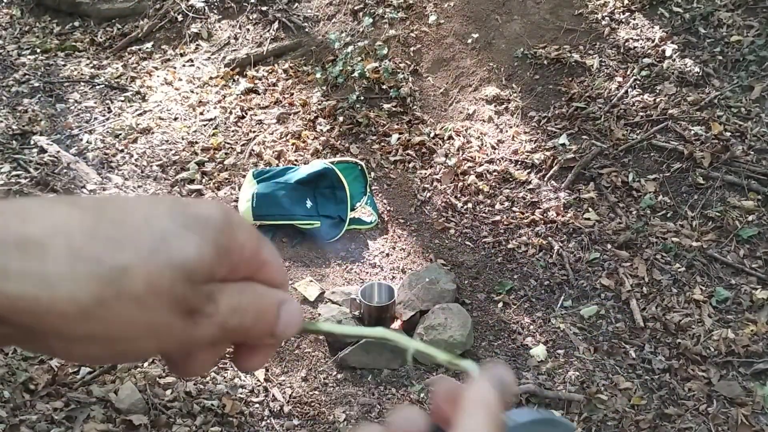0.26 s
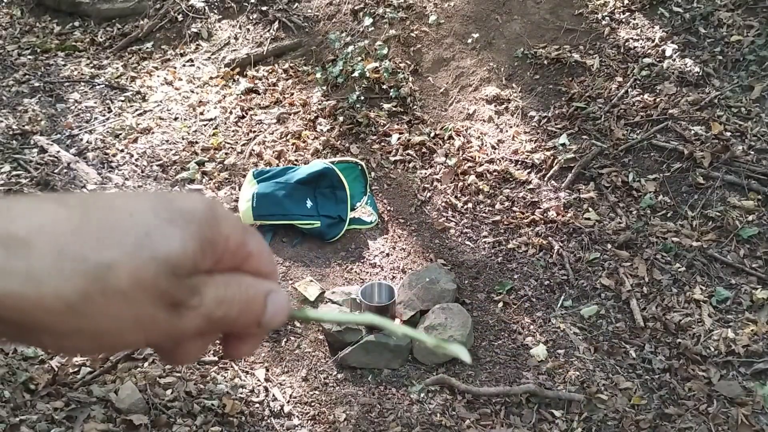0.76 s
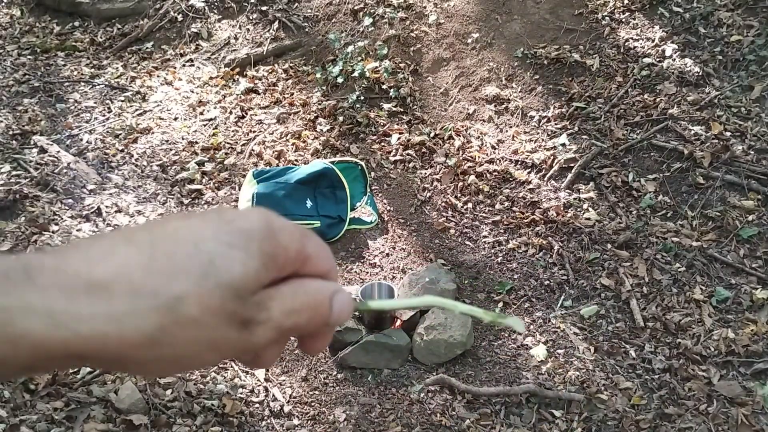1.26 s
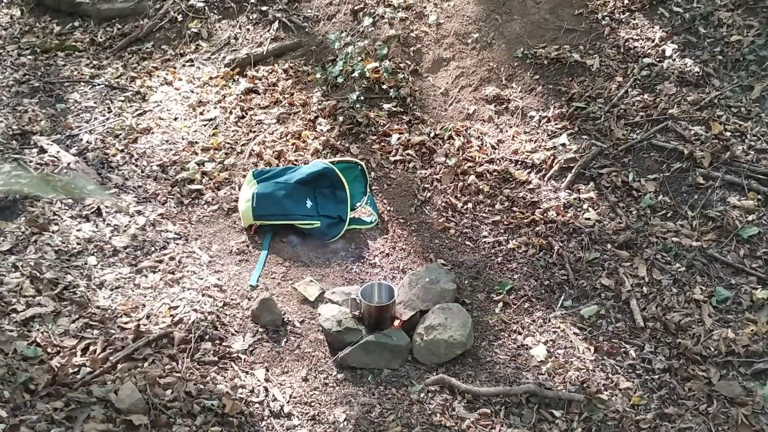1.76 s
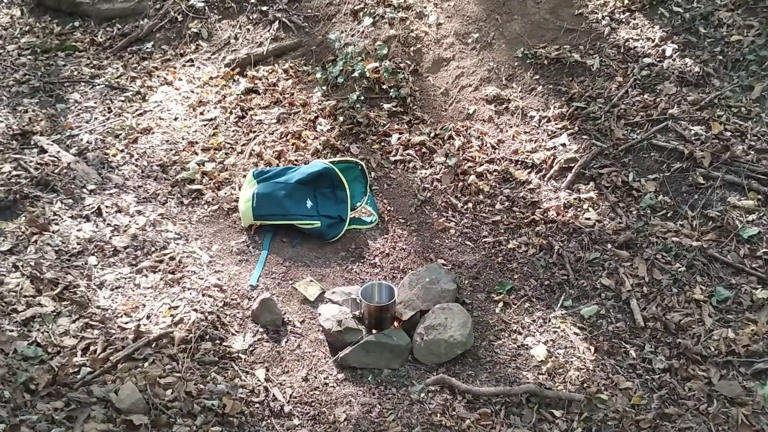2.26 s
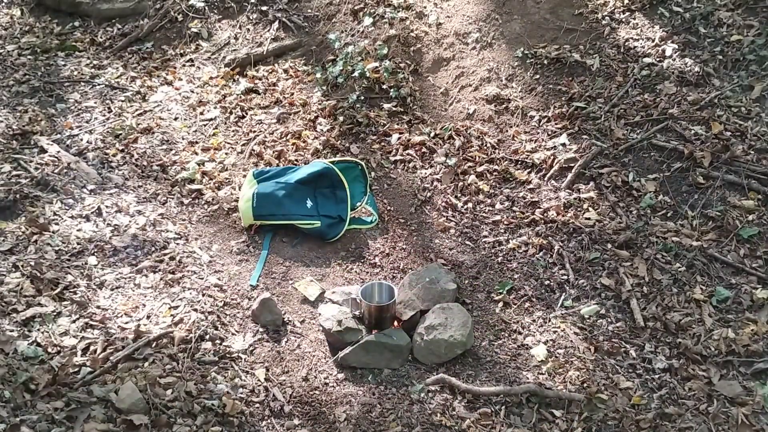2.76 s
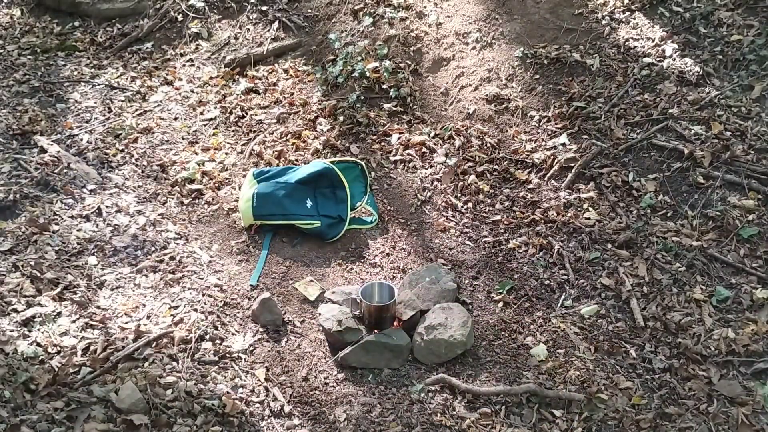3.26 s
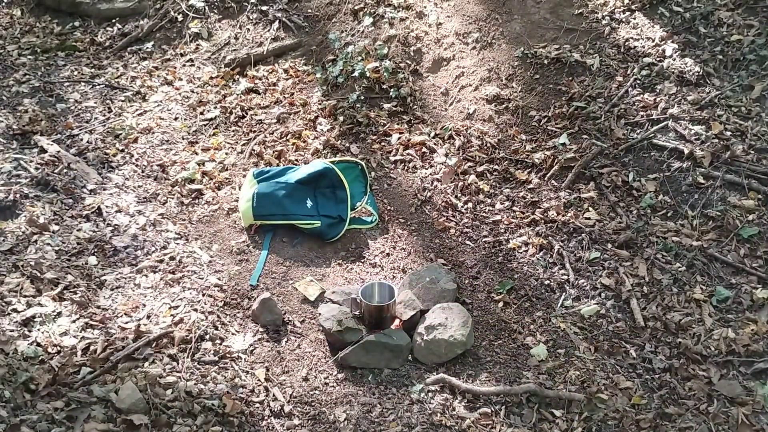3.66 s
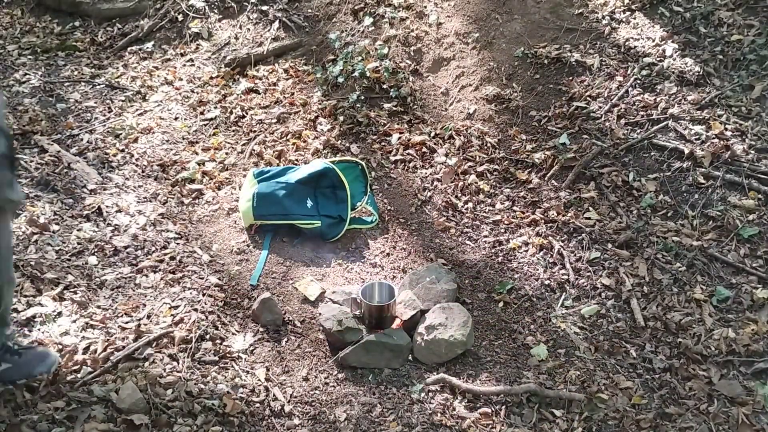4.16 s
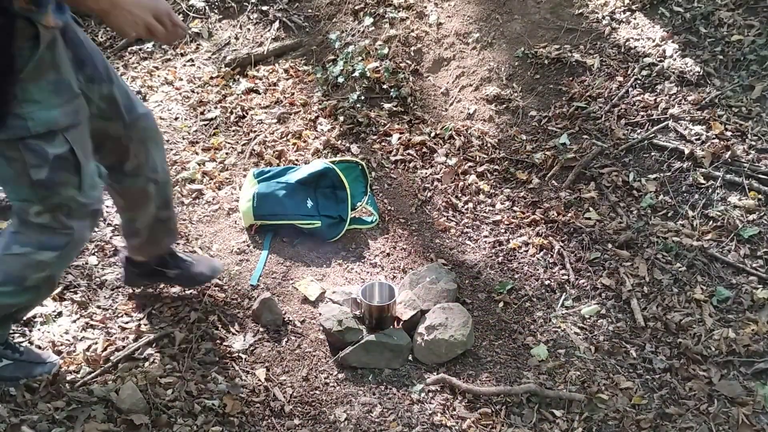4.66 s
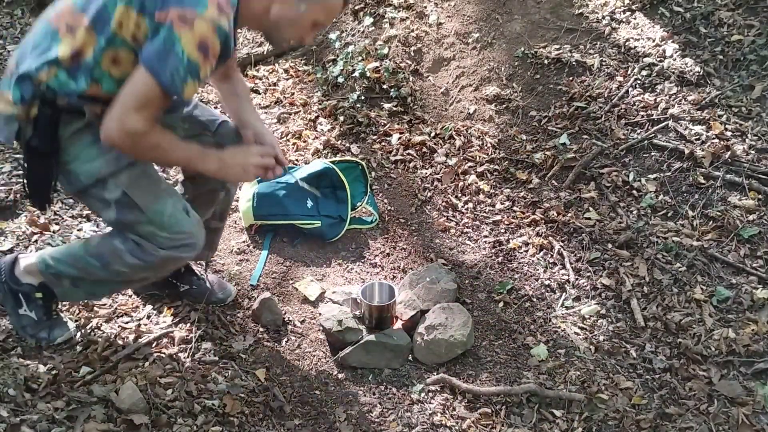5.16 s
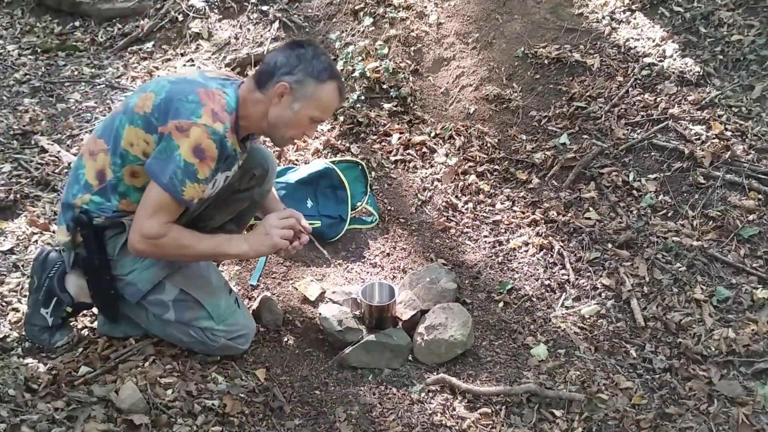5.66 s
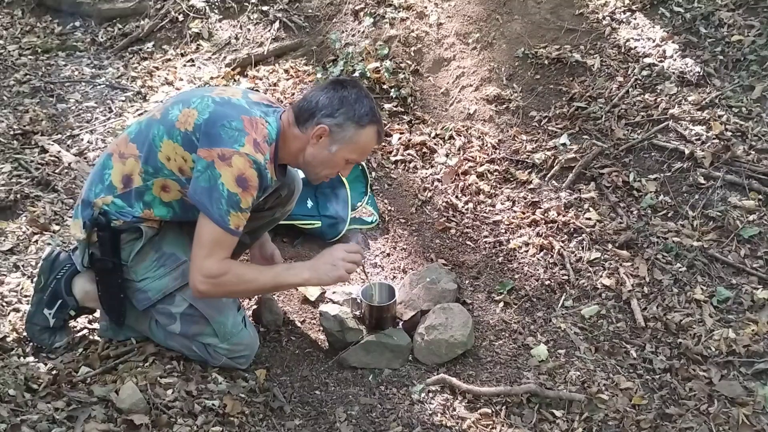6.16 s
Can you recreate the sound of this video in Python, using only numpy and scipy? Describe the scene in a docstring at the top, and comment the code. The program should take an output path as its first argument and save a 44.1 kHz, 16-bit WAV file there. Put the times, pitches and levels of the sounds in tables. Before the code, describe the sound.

A soft outdoor hiss opens with two dull handling bumps on the microphone, then fades behind footsteps in dry forest leaves. The steps crunch and crackle, with stalks and twigs snapping sharply underfoot. After a brief lull, the walker comes nearer with a faint swish of trousers and kneels with a dragging rustle. The steps are heard to the left of the microphones.

```python
"""A broad outdoor hiss comes first, with two soft handling bumps, and sinks away behind footsteps.
Left of the microphones, someone walks round a camp site on dry forest litter, comes closer and kneels.
Each step crushes leaves into thousands of tiny fractures; stalks snap, twigs crack and the sole grinds
the soil. Trousers swish with each move, and ground and trunks scatter the sound of the feet."""
import sys
import numpy as np
from scipy import signal
from scipy.fft import rfft, irfft
from scipy.io import wavfile
from scipy.ndimage import map_coordinates

SR = 44100
rng = np.random.default_rng(int(sys.argv[2]) if len(sys.argv) > 2 else 0)


def store_wav(level_fs):
    """Save 16-bit WAV to argv[1]."""
    pcm = np.round(np.clip(np.atleast_2d(level_fs), -1, 1) * 32767)
    wavfile.write(sys.argv[1], SR, pcm.T.astype(np.int16))


N = 282240
TIME = np.arange(N) / SR

# A foot crushes a patch of leaves: full_weight_s, level_db, rise_s, fade_20db_s
# (levels in all tables are relative, within their own layer)
CRUSHES = [(1.692, -47, 0.0656, 0.6922), (1.932, -36, 0.0668, 0.2324), (2.215, -42.5, 0.0239, 0.3763),
           (2.357, -39, 0.04984, 0.0007), (2.395, -34.5, 0.02487, 0.1793), (2.44, -31.5, 0.05429, 0.1403),
           (2.835, -44.5, 0.02372, 0.2241), (3.603, -41, 0.02625, 0.1351), (3.725, -43, 0.0536, 0.1861),
           (3.895, -47.5, 0.04354, 0.0749), (4.101, -45, 0.01093, 0.047), (4.191, -35.5, 0.07395, 0.1348),
           (4.234, -33.5, 0.0754, 0.0535), (4.794, -49, 0.0272, 0.339), (5.099, -42.5, 0.04673, 0.1276),
           (5.16, -44.5, 0.01317, 0.1342), (5.715, -45, 0.0346, 0.0423), (5.805, -41, 0.02814, 0.3126),
           (6.214, -59.5, 0.01453, 1)]
# A foot or knee drags through the litter: start_s, length_s, level_db
DRAGS = [(0.0, 0.1688, -58.5), (1.188, 0.1135, -51.5), (1.33, 0.803, -54.5), (2.501, 0.20852, -52.5),
         (2.992, 0.11257, -56.5), (4.779, 0.24976, -52), (5.52, 0.0906, -60), (5.592, 0.1217, -48.5),
         (5.691, 0.273, -45.5), (6.001, 0.09064, -63)]
def foot_effort(drag_rise_s=0.02215, drag_fade_s=0.06583, settling_db=-67.5):
    """How hard the feet work the litter, in dB: crushes, drags and settling leaves add in power."""
    moves = [from_db(db) * envelope(s - rise, rise, 0, fade) for s, db, rise, fade in CRUSHES]
    moves += [from_db(db) * envelope(s, drag_rise_s, length, drag_fade_s) for s, length, db in DRAGS]
    return 10 * np.log10(from_db(settling_db) ** 2 + sum(move ** 2 for move in moves))


# Dry leaves on the forest floor, crisp in the treble: freq_hz, level_db
LEAF_SPECTRUM = [(200, -39), (700, -19.5), (2200, -18.5), (3500, -15), (4700, -13.5), (5800, -9.5),
                 (7200, -6), (8700, -1), (10500, -3.5), (13000, -6), (16000, -8)]
def leaves(effort_db, ordinary_effort_db=-46.5):
    """The harder the foot works, the more fractures a second; sliding leaves add a smooth swish."""
    per_s = 9000 * from_db(.4 * (effort_db - ordinary_effort_db))
    clicks = fractures(per_s, spread_db=3.5, clump_db=1.9, low_hz=711.3, high_hz=14916, width=0.697)
    crackle = coloured(clicks / np.sqrt(per_s), LEAF_SPECTRUM)
    swish = coloured(rng.standard_normal(N), LEAF_SPECTRUM)
    rustle = from_db(effort_db) * (from_db(5) * crackle + from_db(-0.5) * swish)
    # the litter is crisper in some spots along the walk than in others
    *_, crispness_db = in_time(WALK)
    top_octave = butterworth(rustle, 1, 11000, "high")
    return rustle + (from_db(crispness_db) - 1) * top_octave


def fractures(per_s, spread_db, clump_db, low_hz, high_hz, width, count=12):
    """Clumps of uneven clicks; each rings briefly at its flake's pitch (width is a share of that)."""
    breaks = rng.random(N) < per_s / SR
    sizes = from_db(spread_db * np.minimum(rng.exponential(1, N), 4.5)) * rng.choice([-1, 1], N)
    clumping = from_db(clump_db * np.clip(drift(66.52), -2, 2))
    clicks = breaks * sizes * clumping
    flake = rng.integers(0, count, N)
    pitches_hz = np.geomspace(low_hz, high_hz, count)
    return sum(resonance(clicks * (flake == k), hz, hz * width) for k, hz in enumerate(pitches_hz))


# The loudest brittle stalks snapping underfoot: start_s, level_db
SNAPS = [(1.296, -26.5), (1.487, -24), (1.629, -26), (1.65, -23), (1.687, -22), (1.939, -19.5),
         (2.142, -18.5), (2.216, -16.5), (2.2279, -8), (2.233, -16.5), (2.279, -18.5), (2.306, -17),
         (2.625, -27), (2.835, -19), (2.9, -27.5), (3.617, -32), (3.731, -19), (3.895, -26), (4.097, -27),
         (4.232, -12.5), (4.352, -33), (4.862, -31.5), (5.165, -28.5), (5.603, -29.5), (5.618, -24.5),
         (5.718, -20.5), (5.8, -17.5), (6.205, -35), (6.231, -31.5)]
# The bright crack of one stalk: freq_hz, level_db
SNAP_SPECTRUM = [(300, -29), (3000, -18.5), (4700, -7), (6000, -5.5), (9000, 2.5), (11500, -4), (16000, -8)]
def stalks(typical_db=-26, typical_tear_ms=0.417, splinter_db=-26, splinter_s=0.00168):
    """A stalk tears fibre by fibre, quicker in a harder snap, then splinters briefly."""
    out, t = np.zeros(N), TIME[:1024]
    for s, db in SNAPS:
        tear_ms = typical_tear_ms * from_db(-0.6814 * (db - typical_db))
        progress = t * 1000 / tear_ms
        tear = progress * np.exp(1 - progress)
        splinters = from_db(splinter_db) * np.exp(-t / splinter_s)
        crack = coloured((tear + splinters) * rng.standard_normal(len(t)), SNAP_SPECTRUM)
        add(out, s + .0008, from_db(db + 12) * crack / np.linalg.norm(crack))
    return out


# Twigs cracking underfoot: start_s, level_db, pitch_ratio
TWIG_BREAKS = [(1.487, -37, 1.1504), (1.848, -28, 1.0691), (1.895, -34, 1.1918), (2.217, -30, 1.014),
               (2.2277, -23.5, 0.8983), (2.233, -31, 0.68814), (2.305, -30, 1.2562), (3.665, -39.5, 1.0145),
               (3.897, -43, 1.1563), (4.2549, -34, 1.0227)]
# The ring of a typical twig: pitch_hz, level_db, t60_s
TWIG_MODES = [(655.54, -2.5, 0.008467), (1004, -3.5, 0.006423), (1325.6, -1.5, 0.006446),
              (2124.4, 0.5, 0.003115), (2905.6, 0, 0.003325), (3789.2, -2.5, 0.00171)]
def twigs():
    """Each break strikes the heavily damped modes of the wood with strengths of its own."""
    out, t = np.zeros(N), TIME[:2048]
    for s, db, pitch_ratio in TWIG_BREAKS:
        knock = 0
        for k, (hz, mode_db, t60) in enumerate(TWIG_MODES):
            decay = from_db(mode_db + rng.standard_normal() - 60 * t / t60)
            knock += (-1) ** k * decay * np.sin(2 * np.pi * hz * pitch_ratio * t)
        add(out, s + 0.00091583, from_db(db + 4.5) * knock / np.abs(knock).max())
    return out


# The sole takes the walker's weight: centre_s, level_db, half_length_s
PRESSES = [(1.937, -38, 0.03773), (2.227, -34, 0.02518), (2.385, -39, 0.0816), (3.674, -46, 0.06564),
           (4.205, -53.5, 0.02953), (4.252, -39.5, 0.03425), (4.811, -44.5, 0.02465)]
# The soil beneath the leaves: freq_hz, level_db
SOIL_SPECTRUM = [(100, -12), (400, -2.5), (800, 0), (1150, -2), (1650, 2.5), (2400, -7), (3500, -5),
                 (6000, -10.5), (16000, -51)]
def soil():
    """Under full weight, grit and buried litter crunch more dully."""
    weight = sum(from_db(db) * np.exp(-.5 * ((TIME - s) / half) ** 2) for s, db, half in PRESSES)
    grit = fractures(4000, spread_db=2, clump_db=4, low_hz=399.2, high_hz=6066, width=0.8537)
    return from_db(-10) * weight * coloured(grit, SOIL_SPECTRUM)


# A creak as the walker crouches near the microphones: start_s, length_s, level_db
CREAK = (5.251, 0.005121, -36.5)
def creak():
    """A very short run of slips rings two bright resonances."""
    s, length, db = CREAK
    slips = np.zeros(N)
    add(slips, s, rng.standard_normal(int(length * SR)))
    lower, upper = [resonance(resonance(slips, hz, width_hz), hz, width_hz)
                    for hz, width_hz in [(6400, 3107), (9000, 4395)]]
    return from_db(db + 9.5) * (lower - from_db(-6) * upper)


# The walk, left of the microphone pair: time_s, right_lag_ms, right_treble_db, litter_crispness_db
WALK = [(1.2, 0.3325, -10.5, -4.5), (2.4, 0.29623, -17, 4), (3.7, 0.25344, -9, -7), (4.2, 0.20663, -8, -1),
        (5.1, 0.18735, -4.5, -9), (5.8, 0.12636, -4, -6)]
def from_the_left(feet):
    """The right microphone hears the feet later and duller; ground and trunks scatter the sound."""
    lag_ms, treble_db, _ = in_time(WALK)
    low = butterworth(feet, 1, 3000, "low")
    shaded = from_db(-4.5) * low + from_db(treble_db - 1.5) * (feet - low)
    lag_samples = (lag_ms + 0.02473 * drift(70.95)) * SR / 1000  # fractures lie all over the sole
    delayed = map_coordinates(shaded, [np.arange(N) - lag_samples], order=3)
    ground = from_db([[-8.5], [-10]]) * scatter(feet, t60_s=.03)
    trunks = from_db([[-17], [-20]]) * scatter(feet, t60_s=.5)
    left, right = np.array([feet, delayed]) + ground + trunks
    # the right microphone's port lacks the left one's bright peak
    return np.array([left, right - (1 - from_db(-6)) * resonance(right, 10120, 5310)])


def scatter(x, t60_s, count=4):
    """A dying cloud of small reflections, different at each microphone and shifting at random."""
    t, out = TIME[:int(t60_s * SR)], 0
    shares = np.array([drift(12.908) for _ in range(count)])
    for share in shares / np.linalg.norm(shares, axis=0):
        cloud = rng.standard_normal((2, len(t))) * from_db(-60 * t / t60_s) * (t > .0005)
        cloud /= np.linalg.norm(cloud, axis=1, keepdims=True)
        out = out + signal.oaconvolve((x * share)[None], cloud, axes=1)[:, :N]
    return out


# Trouser cloth, soft and broad at both microphones: freq_hz, level_db
CLOTH_SPECTRUM = [(20, -28.5), (60, -4.5), (130, 1.5), (300, -3), (700, -5.5), (1600, -7), (3000, -10),
                  (7500, -8.5), (16000, -30.5)]
def trousers(effort_db, half_swish_db=-50.5, lag_s=0.01379, arrival_s=3.5492, approach_db_per_s=8):
    """Cloth swishes with each move, levels off in hard steps and grows until the walker is close by."""
    swish = 1 / (1 + from_db(half_swish_db - effort_db))
    pole = np.exp(-1 / (lag_s * SR))
    smoothed = signal.lfilter([1 - pole], [1, -pole], swish)
    distance_db = approach_db_per_s * np.minimum(TIME - arrival_s, 0)
    return from_db(-59.5 + distance_db) * smoothed * diffuse_noise(CLOTH_SPECTRUM)


# Soft handling bumps at the microphones: start_s, level_db
BUMPS = [(0.145, -45.5), (0.367, -44.5)]
def handling_bumps(pitch_hz=78, t60_s=0.1593):
    """Dull low thuds that die in a few cycles, stronger on the left."""
    out, t = np.zeros(N), TIME[:SR // 4]
    thud = np.sin(2 * np.pi * pitch_hz * t) * from_db(-60 * t / t60_s)
    for s, db in BUMPS:
        add(out, s, from_db(db + 3.5) * thud)
    return out * from_db([[0], [-4]])


# The outdoor hiss behind the walker: time_s, level_db
HISS_LEVELS = [(0.0, -55.5), (1.1, -56.5), (1.93, -56.5), (2.3, -60.5), (2.75, -71), (3.3, -79),
               (3.9, -68.5), (4.65, -73), (5.45, -73), (6.05, -69.5), (6.4, -71)]
# Brief dips in that hiss: start_s, length_s, depth_db
HISS_DIPS = [(0.936, 0.1373, -5.5), (1.119, 0.0524, -4)]
# Its broad colour: freq_hz, level_db
HISS_SPECTRUM = [(20, -34.5), (45, -9.5), (85, -2), (140, -3), (350, -3), (520, -4.5), (800, -6),
                 (1500, -8.5), (3300, -9), (7800, -9.5), (10000, -14), (13000, -22), (16000, -27.5)]
def outdoor_hiss(dip_edge_s=0.0307):
    """The hiss is strong at first, dips twice, then sinks to a faint floor."""
    level_db, = in_time(HISS_LEVELS)
    dips_db = sum(db * envelope(s, dip_edge_s, length, dip_edge_s) for s, length, db in HISS_DIPS)
    return from_db(level_db + dips_db) * diffuse_noise(HISS_SPECTRUM)


# How alike hiss and cloth are at the two microphones: freq_hz, likeness_ratio
MIC_LIKENESS = [(60, 1.0534), (130, 0.6518), (290, 0.9405), (640, 0.2963), (1300, -0.3137), (2600, 0.0866),
                (8000, 0)]
# How far both lean to the left microphone: freq_hz, left_minus_right_db
MIC_BALANCE = [(100, 4.532), (1000, 4.816), (4400, 2.913), (8100, 6.685), (15000, 7.01)]
def diffuse_noise(spectrum):
    """Broad soft noise, alike at both microphones only in the bass."""
    hz = np.fft.rfftfreq(N, 1 / SR)
    alike = np.clip(at_hz(MIC_LIKENESS, hz), -1, 1)
    mid, side = rfft(rng.standard_normal((2, N)))
    sign = np.array([[1], [-1]])
    pair = np.sqrt(1 + alike) * mid + sign * np.sqrt(1 - alike) * side
    colour_db = at_hz(spectrum, hz) + sign * at_hz(MIC_BALANCE, hz) / 2
    return from_db(9.5) * unit_rms(irfft(pair * from_db(colour_db), N))


def from_db(db):
    return 10 ** (np.asarray(db) / 20)


def unit_rms(x):
    return x / np.sqrt(np.mean(x ** 2) + 1e-20)


def in_time(rows):
    """Each column of a curve, sample by sample."""
    s, *columns = np.transpose(rows)
    return [np.interp(TIME, s, column) for column in columns]


def at_hz(points, hz):
    """A spectrum read on a log-frequency axis."""
    points_hz, values = np.transpose(points)
    return np.interp(np.log(hz + 1), np.log(points_hz), values)


def add(track, s, sound):
    """Lay a sound into a track at a given time."""
    start = round(s * SR)
    track[start:start + len(sound)] += sound[:N - start]


def envelope(start_s, rise_s, length_s, fade_s):
    """A straight rise to 1, held until length_s after the start, then a fall of 20 dB per fade_s."""
    rise = np.clip((TIME - start_s) / rise_s, 0, 1)
    fading_s = np.maximum(TIME - start_s - max(rise_s, length_s), 0)
    return rise * 10 ** -np.minimum(fading_s / fade_s, 10)


def drift(rate_hz, hop=40):
    """A smooth random wander with spread 1."""
    pole = np.exp(-2 * np.pi * rate_hz * hop / SR)
    noise = rng.standard_normal(N // hop + 2002)
    slow = signal.lfilter([1], [1, -2 * pole, pole * pole], noise)[2000:]
    return np.interp(np.arange(N) / hop, np.arange(len(slow)), unit_rms(slow))


def butterworth(x, order, hz, kind):
    return signal.sosfilt(signal.butter(order, hz, kind, fs=SR, output="sos"), x)


def resonance(x, hz, width_hz):
    """A two-pole resonance with gain 1 at its peak."""
    r = np.exp(-np.pi * width_hz / SR)
    feedback = [1, -2 * r * np.cos(2 * np.pi * hz / SR), r * r]
    return signal.lfilter(np.array([1, 0, -1]) * (1 - r * r) / 2, feedback, x + 1e-18)


def coloured(x, spectrum, size=2048):
    """Shape a sound with a causal (minimum-phase) filter of the given spectrum; rms 1."""
    gain = from_db(at_hz(spectrum, np.fft.rfftfreq(size, 1 / SR)))
    cepstrum = irfft(np.log(gain))
    cepstrum[1:size // 2] *= 2
    cepstrum[size // 2 + 1:] = 0
    impulse_response = irfft(np.exp(rfft(cepstrum)))
    return unit_rms(signal.oaconvolve(x, impulse_response)[:N])


def scene():
    """Footsteps and trousers over the outdoor hiss, at a stereo pair of microphones."""
    effort_db = foot_effort()
    feet = leaves(effort_db) + soil() + stalks() + twigs() + creak()
    feet = butterworth(feet, 2, 310, "high")  # things as small as leaves and twigs radiate no bass
    return from_the_left(feet) + trousers(effort_db) + handling_bumps() + outdoor_hiss()


def record(dry, cutoff_hz=15950):
    """The highest treble is cut steeply."""
    return signal.sosfilt(signal.ellip(12, .1, 80, cutoff_hz, fs=SR, output="sos"), dry)


dry = scene()
out = record(dry)
store_wav(out)
```